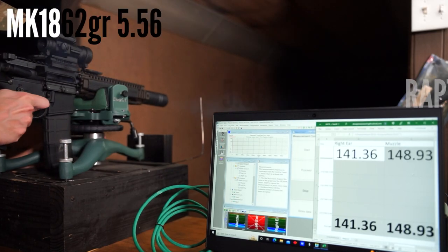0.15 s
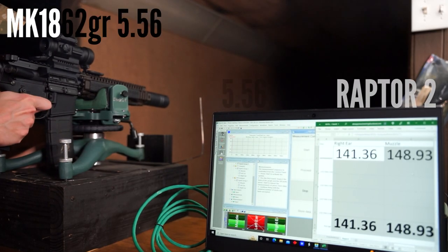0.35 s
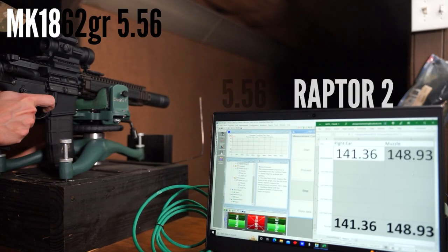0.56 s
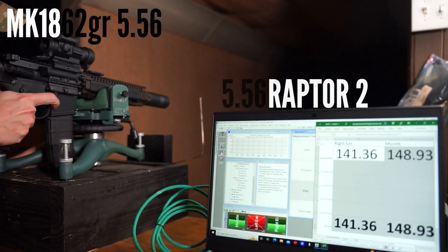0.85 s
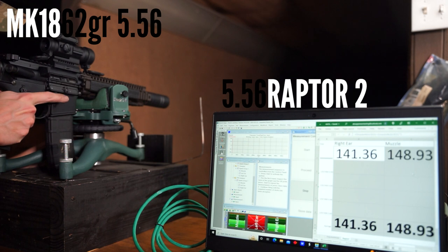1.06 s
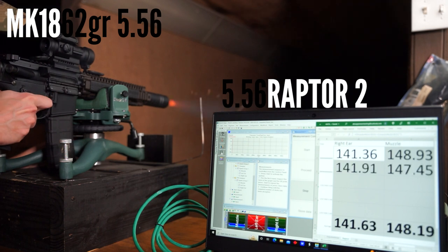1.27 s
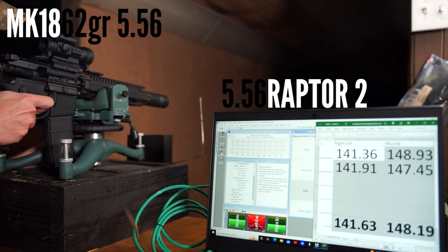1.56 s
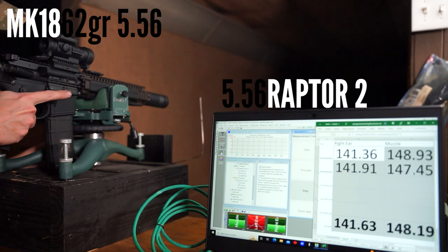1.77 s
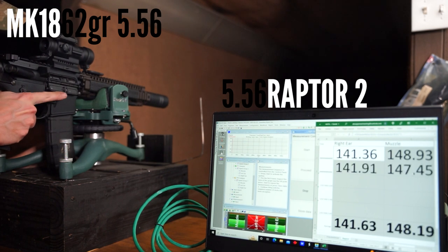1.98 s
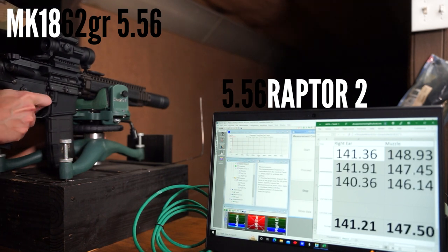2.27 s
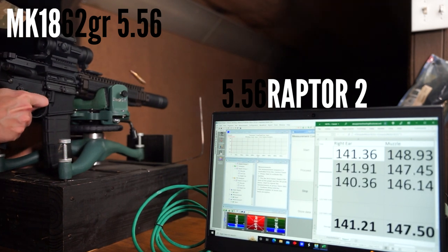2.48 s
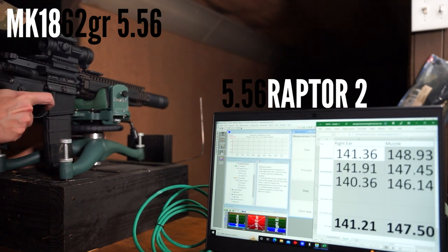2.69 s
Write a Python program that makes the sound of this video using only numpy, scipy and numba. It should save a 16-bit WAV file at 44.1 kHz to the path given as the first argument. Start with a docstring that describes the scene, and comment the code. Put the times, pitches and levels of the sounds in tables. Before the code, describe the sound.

Three suppressed rifle shots, a second apart, booming in a small shed, with brass cases pinging

```python
"""Rifle shots in a shed

Three shots from a suppressed rifle clamped on a bench: each is a pressure front with a dying noise jet, which
overloads the microphone, booms in low room tones and leaves a bright noise tail while the bolt cycles. Spent
brass cases ping as beating damped sines and knock on the boards as short noise bursts. Mains hum, a sum of
sines, lies under shaped room noise; a bright hiss rises just before the last shot and then stays on faintly."""
import sys
import numpy as np
from scipy import signal
from scipy.fft import rfft, irfft, next_fast_len
from scipy.io import wavfile
from numba import njit

SR = 44100
rng = np.random.default_rng(int(sys.argv[2]) if len(sys.argv) > 2 else 0)


def persist_wave(psi):
    """Save psi, clipped to +-1, as 16-bit WAV."""
    counts = np.round(np.clip(psi, -1, 1) * 32767).astype(np.int16)
    wavfile.write(sys.argv[1], SR, np.atleast_2d(counts).T)


N = 125685  # samples

# The shots. Each row: start in seconds, level of the blast in dB, level of the room's answer in dB,
# tilt of the noise tail in dB per octave.
SHOTS = [(0.2007, 2.5, .5, -0.05), (1.3508, -0.5, 0.5, 0.13), (2.4138, .5, .5, 0.6)]


def amp(db):
    """The decibel is logarithmic: 20 dB is a tenfold amplitude."""
    return 10 ** (np.asarray(db) / 20)


def unit(x):
    """Dividing by the root mean square brings a signal to rms 1."""
    return x / np.sqrt(np.mean(x ** 2) + 1e-20)


def along(points, hz):
    """Pitch is logarithmic, so (Hz, value) points are joined on a log frequency axis."""
    point_hz, values = np.transpose(points)
    return np.interp(np.log(hz + 1), np.log(point_hz + 1), values)


def noise(spectrum, size=SR):
    """Filtering: white noise times a spectrum in dB gives coloured noise, here at rms 1."""
    hz = np.fft.rfftfreq(size, 1 / SR)
    white = rfft(rng.standard_normal(size))
    return unit(irfft(white * amp(along(spectrum, hz)), size))


def fall(t, t60):
    """Exponential decay: the level falls 60 dB in t60 seconds."""
    return np.exp(-np.log(1000) * t / t60)


def burst(spectrum, t60, size=4096):
    """An impact excites many modes at once, heard as a short decaying puff of coloured noise."""
    return noise(spectrum, size=size) * fall(np.arange(size) / SR, t60)


def ring(tones, t):
    """Additive synthesis: each (Hz, dB, t60) tone is a damped sine of random phase."""
    out = np.zeros(len(t))
    for hz, db, t60 in tones:
        out += amp(db) * fall(t, t60) * np.sin(2 * np.pi * (hz * t + rng.random()))
    return out


def add(track, start_s, x):
    """Superposition: x is summed into the track from start_s on."""
    i = max(round(start_s * SR), 0)
    track[i:i + len(x)] += x[:max(N - i, 0)]


def dying(x, hold_s):
    """Reverberant decay: after a hold, each frequency dies at the rate set by absorption in the shed."""
    # Decay of the shed. Each row: frequency in Hz, decay time t60 in seconds.
    shed_t60 = [(60, 0.85), (250, 0.42), (700, 0.54), (1800, 0.61), (4200, 0.8), (8000, 0.7), (14000, .41)]
    hz, t, bins = signal.stft(x, SR, nperseg=256)
    bins = bins * fall(np.maximum(t - hold_s, 0), along(shed_t60, hz)[:, None])
    return signal.istft(bins, SR, nperseg=256)[1][:len(x)]


def switched(rows, spectrum):
    """Gating: steady noise is multiplied by short linear ramps at the ends of each (start, end, dB) row."""
    edge_s = 0.002
    t, gain = np.arange(N) / SR, np.zeros(N)
    for start_s, end_s, db in rows:
        gain += amp(db) * np.clip(np.minimum(t - start_s, end_s - t) / edge_s + .5, 0, 1)
    return noise(spectrum, size=N) * gain


def mains_hum():
    """Additive synthesis: steady sines make the hum, louder until the first shot."""
    # Lines of the hum. Each row: frequency in Hz, rms level from the first shot on in dB.
    hum_lines = [(118.4, -54.5), (188.4, -71), (236.9, -60.5), (258.4, -69), (301, -64.5)]
    start_db = 12  # extra level until the first shot
    t, hum = np.arange(N) / SR, np.zeros(N)
    for hz, db in hum_lines:
        hum += np.sqrt(2) * amp(db) * np.sin(2 * np.pi * (hz * t + rng.random()))
    return hum * amp(start_db * (t < SHOTS[0][0]))


def room_noise():
    """Broadband noise: a steady rumble, with louder stretches of differently coloured noise just before each
    shot."""
    # Spectrum of the rumble. Each row: frequency in Hz, relative level in dB.
    rumble_spectrum = [(25, -17), (60, -12.5), (120, -2.5), (170, -4.5), (280, -9.5), (420, -16),
                       (1000, -22), (2000, -19.5), (4000, -28), (8000, -34), (15000, -46.5)]
    # Louder spells. Each row: start in seconds, end in seconds, level in dB.
    spells = [(-.05, .195, -45), (1.287, 1.35, -44.5), (2.33, 2.41, -43.5)]
    # Spectrum of the spells. Each row: frequency in Hz, relative level in dB.
    air_spectrum = [(30, -21.5), (70, -15), (120, 1.5), (260, -3), (450, -10.5), (1200, -17.5),
                    (2100, -14.5), (3200, -24.5), (4600, -21.5), (8000, -33.5), (15000, -37.5)]
    rumble = amp(-53) * noise(rumble_spectrum, size=N)
    return rumble + switched(spells, air_spectrum)


def flat_hiss():
    """Broadband noise gated in steps: it enters strongly, then drops to a faint level."""
    # Steps of the hiss. Each row: start in seconds, end in seconds, level in dB.
    hiss_steps = [(2.331, 2.386, -30.5), (2.386, 2.413, -42), (2.413, 2.9, -46)]
    # Spectrum of the hiss. Each row: frequency in Hz, relative level in dB.
    hiss_spectrum = [(100, 3), (250, -1), (600, -7.5), (1600, -10.5), (2700, 2.5), (3300, -6.5), (4350, 2),
                     (5900, -1), (7300, -1.5), (10000, -2.5), (15500, -6)]
    return switched(hiss_steps, hiss_spectrum)


def case_pings():
    """Beating: a landing case ticks, and each of its two modes is split into a close pair of sines."""
    # Cases landing. Each row: start in seconds, tick level in dB, low mode in Hz, its level in dB,
    # high mode in Hz, its level in dB.
    cases = [(.583, -41, 11060, -40.5, 14950, -52), (.811, -14.5, 11060, -36, 14950, -30),
             (.9413, -43, 11060, -49.5, 14950, -48), (1.2425, -51, 11060, -43.5, 14950, -49),
             (1.6964, -52, 10900, -62, 15300, -50), (1.8856, -57, 10890, -51, 15230, -54),
             (2.0023, -68, 10890, -79, 15100, -54), (2.108, -70, 10890, -69, 15100, -70),
             (2.17, -64, 10890, -63, 15150, -68)]
    # Spectrum of the tick. Each row: frequency in Hz, relative level in dB.
    tick_spectrum = [(1500, -42), (4000, -26), (6500, -14.5), (11000, -11.5), (13500, -15.5), (14900, 9.5),
                     (15700, -3)]
    case_t60, split_hz = 0.2, 70
    tick_t60, tick_rise_s = 0.014, 0.00016
    out, t = np.zeros(N), np.arange(SR) / SR
    tick_shape = fall(t, tick_t60) * (1 - np.exp(-t / tick_rise_s))
    for start_s, tick_db, low_hz, low_db, high_hz, high_db in cases:
        pairs = []
        for hz, db in [(low_hz, low_db), (high_hz, high_db)]:
            pairs.append((hz - split_hz / 2, db - 10, case_t60))
            pairs.append((hz + split_hz / 2, db - 4, case_t60))
        tick = amp(tick_db) * noise(tick_spectrum) * tick_shape
        add(out, start_s, ring(pairs, t) + tick)
    return out


def case_clinks():
    """Modal impact: a case strikes a metal fitting, which rings in its modes under a crack of noise."""
    # Strikes. Each row: start in seconds, level in dB.
    clinks = [(.9413, -42.5), (.956, -46.5)]
    # Modes of the fitting. Each row: frequency in Hz, relative level in dB, decay time t60 in seconds.
    fitting_modes = [(937, -0.5, 0.17), (1600, -10, 0.52), (1890, -20, .4), (4495, 1, 0.15),
                     (5346, -27, 0.34), (8580, -1.5, .2), (13730, -19, 0.23)]
    # Spectrum of the crack. Each row: frequency in Hz, relative level in dB.
    crack_spectrum = [(500, -28), (750, -13), (950, 3.5), (1400, -1), (2000, 0), (3000, -6), (4500, -1.5),
                      (6500, -4.5), (8500, -5), (11000, -18), (15000, -21.5)]
    crack_db, crack_t60 = 7, 0.048  # dB relative to the strike, seconds
    out, t = np.zeros(N), np.arange(SR) / SR
    for start_s, db in clinks:
        crack = amp(crack_db) * noise(crack_spectrum) * fall(t, crack_t60)
        add(out, start_s, amp(db) * (ring(fitting_modes, t) + crack))
    return out


def case_knocks():
    """Damped impact: cases knock and skitter on the boards, whose sound dies within milliseconds."""
    # Knocks. Each row: start in seconds, level in dB.
    knocks = [(.584, -31), (1.622, -26.5), (1.688, -23.5), (1.697, -29), (1.886, -36), (1.908, -31),
              (2.001, -37.5), (2.02, -34), (2.049, -42.5), (2.091, -39.5), (2.109, -40), (2.135, -45.5),
              (2.165, -39.5), (2.204, -41), (2.231, -44), (2.256, -46), (2.273, -48.5)]
    # Spectrum of the boards. Each row: frequency in Hz, relative level in dB.
    boards_spectrum = [(150, -10), (550, -5), (1200, -3), (1900, 5), (3000, 0), (4400, -0.5), (6000, -16),
                       (15000, -48)]
    out = np.zeros(N)
    for start_s, db in knocks:
        add(out, start_s, amp(db) * burst(boards_spectrum, t60=0.022))
    return out


def brass():
    """Convolution: the cases sound directly and through a decaying noise response of the shed."""
    hits_wet_db, pings_wet_db = -9, -19.5  # levels sent to the room
    pings = case_pings()
    hits = case_clinks() + case_knocks()
    room = dying(rng.standard_normal(SR), 0)
    room = room / np.linalg.norm(room)
    sent = amp(hits_wet_db) * hits + amp(pings_wet_db) * pings
    return pings + hits + signal.fftconvolve(sent, room)[:N]


def clicks():
    """Strong damping: light dry clicks at the rifle are noise bursts that do not ring."""
    # Clicks. Each row: start in seconds, level in dB.
    click_rows = [(1.2372, -41.5), (1.243, -33)]
    # Spectrum of a click. Each row: frequency in Hz, relative level in dB.
    click_spectrum = [(500, -25), (2000, 1), (3000, -14), (4500, -2), (7500, 6), (10000, -8), (15000, -19)]
    out = np.zeros(N)
    for start_s, db in click_rows:
        add(out, start_s, amp(db) * burst(click_spectrum, t60=0.0056))
    return out


def action():
    """Steel on steel: the hammer, the bolt at the rear and the bolt closing clack as noise bursts."""
    # Clacks in that order. Each row: delay after the shot in seconds, level in dB,
    # decay time t60 in seconds.
    clacks = [(-.0075, -41.5, .07), (.05, -16, .05), (.079, -12, .07)]
    # Spectrum of the steel. Each row: frequency in Hz, relative level in dB.
    steel_spectrum = [(200, -14.5), (900, -6), (1700, -1.5), (4000, -6), (8000, -12), (15000, -23)]
    out = np.zeros(N)
    for shot_s, *_ in SHOTS:
        for delay_s, db, t60 in clacks:
            add(out, shot_s + delay_s, amp(db) * burst(steel_spectrum, t60))
    return out


def room_boom(t):
    """Reflection: the low wave returns from the walls; damped sines ring, the same after every shot."""
    # Ringing tones of the boom: low room tones and higher tones that colour the tail.
    # Each row: frequency in Hz, level in dB, decay time t60 in seconds.
    boom_tones = [(60, -36.5, 0.13), (78, -20, 0.29), (134.34, -20.5, 0.63), (157.35, -18, 0.35),
                  (257.1, -28, .45), (325, -28.5, 0.73), (437.6, -25, 0.38), (1089, -30.5, 0.6),
                  (1272, -29, 0.45), (1254, -24, 0.48), (1510, -33.5, 0.8), (1662, -21.5, 0.57),
                  (1764, -24, 0.21), (1885, -28.5, 0.57)]
    # Returns of the low wave. Each row: delay after the shot in seconds, level in dB.
    thumps = [(0.012, -9.5), (0.035, -20), (0.047, -15), (0.078, -16)]
    rise_s, thump_width_s = 0.021, 0.0021
    boom = ring(boom_tones, t) * (1 - np.exp(-t / rise_s))
    for delay_s, db in thumps:
        u = (t - delay_s) / thump_width_s
        boom += amp(db) * (1 - u * u) * np.exp(-u * u / 2)  # pulse with a dip on each side
    return boom


def noise_tails(t):
    """Diffuse reverberation: dense echoes are decaying noise, partly alike from shot to shot."""
    # Spectrum of the tail. Each row: frequency in Hz, relative level in dB.
    tail_spectrum = [(25, -28.5), (50, -12.5), (80, -11.5), (125, -9), (180, -5), (310, -8.5), (400, -10.5),
                     (550, -10), (730, -12), (970, -8), (1350, -9.5), (1720, -7), (2050, -9), (2760, -12),
                     (3600, -11.5), (4350, -9.5), (5000, -11.5), (6500, -16), (8000, -17.5), (10700, -23),
                     (13000, -24), (15500, -28.5)]
    tail_db, rise_s, hold_s, sag_db_per_s = -14.5, 0.004, 0.069, 9.5
    alike = 0.45  # share of the noise power common to every shot
    pivot_hz = 2000  # the tilt turns about this, and is level from an octave below it down
    octaves = np.log2(np.maximum(np.fft.rfftfreq(SR, 1 / SR) / pivot_hz, .5))
    swell = (1 - np.exp(-t / rise_s)) * amp(tail_db - sag_db_per_s * np.minimum(t, hold_s))
    walls = noise(tail_spectrum)
    tails = []
    for _, _, _, tilt_db in SHOTS:
        echoes = np.sqrt(alike) * walls + np.sqrt(1 - alike) * noise(tail_spectrum)
        tail = swell * dying(echoes, hold_s)
        tails.append(irfft(rfft(tail) * amp(tilt_db * octaves), SR))
    return tails


def blast(t):
    """Blast wave: a pressure front swings through zero to suction, with the turbulent gas jet as noise."""
    # Spectrum of the gas jet. Each row: frequency in Hz, relative level in dB.
    jet_spectrum = [(25, -26.5), (60, -13), (150, -3.5), (450, -3), (750, -2), (1000, -7.5), (1380, 3),
                    (2000, -4), (2800, -4.5), (3500, -3.5), (4400, -2.5), (5720, -7), (10400, -10),
                    (12700, -10.5), (15500, -11)]
    jet_db, jet_t60 = 2, 0.066
    front_db, front_s = 9, 0.00023  # peak, time to the zero crossing
    front = amp(front_db) * (1 - t / front_s) * np.exp(-t / front_s)
    jet = amp(jet_db) * noise(jet_spectrum) * fall(t, jet_t60)
    return front + jet


def rifle():
    """Direct sound and room response: each blast is summed with the shed's answer, clacks and clicks."""
    t = np.arange(SR) / SR
    out = action() + clicks()
    boom = room_boom(t)
    for (shot_s, blast_db, room_db, _), tail in zip(SHOTS, noise_tails(t)):
        add(out, shot_s, amp(blast_db) * blast(t) + amp(room_db) * (boom + tail))
    return out


def scene():
    """Superposition: the pressures of all sources add at one microphone."""
    background = mains_hum() + room_noise() + flat_hiss()
    return (background + brass() + rifle())[None]


@njit
def follow(x, up, down):
    """Envelope following: a one-pole smoother with separate rise and fall speeds."""
    out, level = np.empty_like(x), 0.
    for i in range(len(x)):
        level += (x[i] - level) * (up if x[i] > level else down)
        out[i] = level
    return out


def record(dry):
    """Saturation and gain control: deep bass is shed, peaks clip, a compressor ducks, the top is cut."""
    low_cut_hz, top_hz = 35, 15850
    overload_db, hardness = -0.5, 11  # clipping level, sharpness of its knee
    threshold_db, squeeze = -12.5, 0.22  # squeeze: dB taken off per dB above the threshold
    attack_s, release_s, out_db = 0.0034, 0.018, -1
    x = signal.lfilter(*signal.butter(2, low_cut_hz, "high", fs=SR), dry[0])
    x = x / (1 + np.abs(x / amp(overload_db)) ** hardness) ** (1 / hardness)
    level = follow(np.abs(x), 1 / (attack_s * SR), 1 / (release_s * SR))
    excess = np.maximum(level / amp(threshold_db), 1)
    x = x * amp(out_db) * excess ** -squeeze
    size = next_fast_len(N + SR // 2)  # padding keeps the end from wrapping to the start
    hz = np.fft.rfftfreq(size, 1 / SR)
    passed = np.clip((top_hz - hz) / 200 + .5, 0, 1)  # 200 Hz wide slope
    return irfft(rfft(x, size) * passed, size)[None, :N]


dry = scene()
out = record(dry)
persist_wave(out)
```